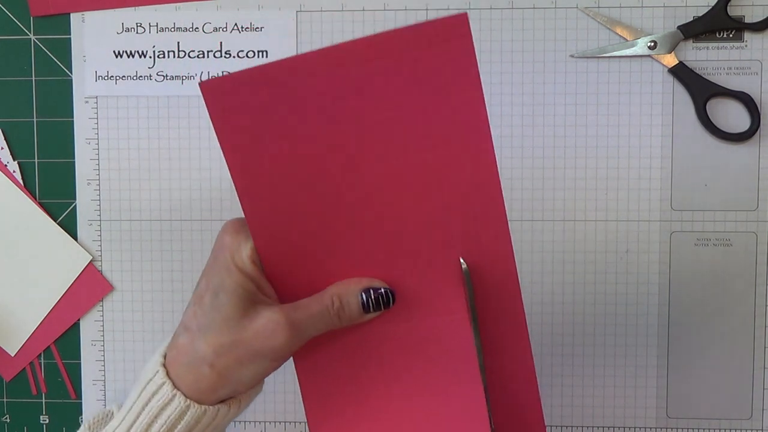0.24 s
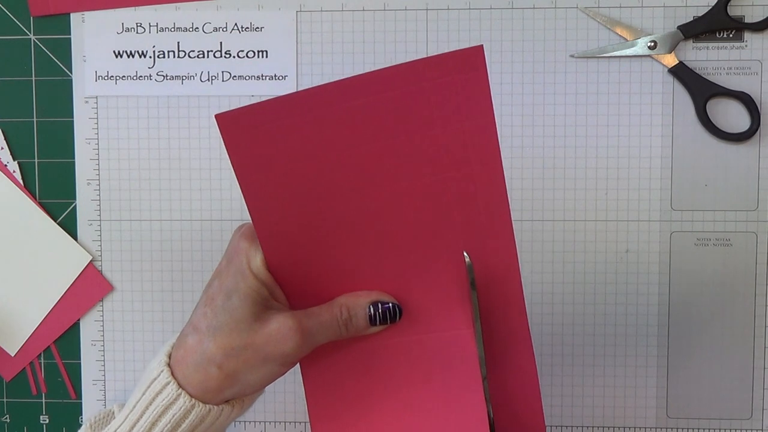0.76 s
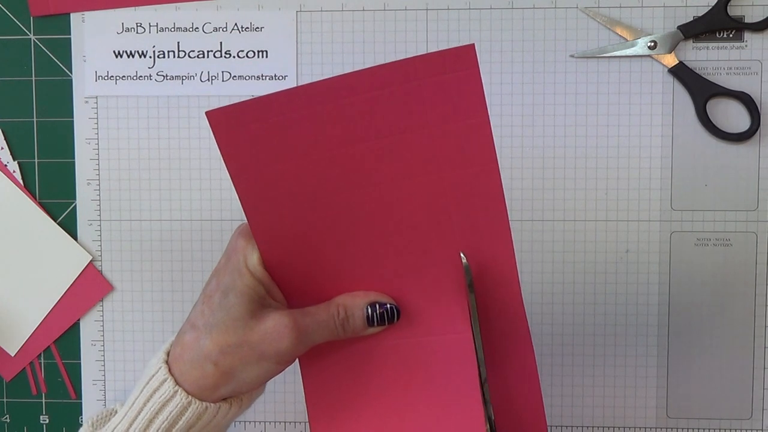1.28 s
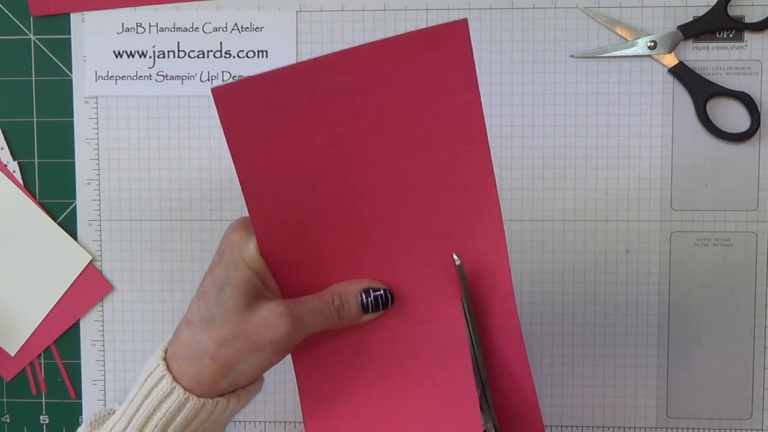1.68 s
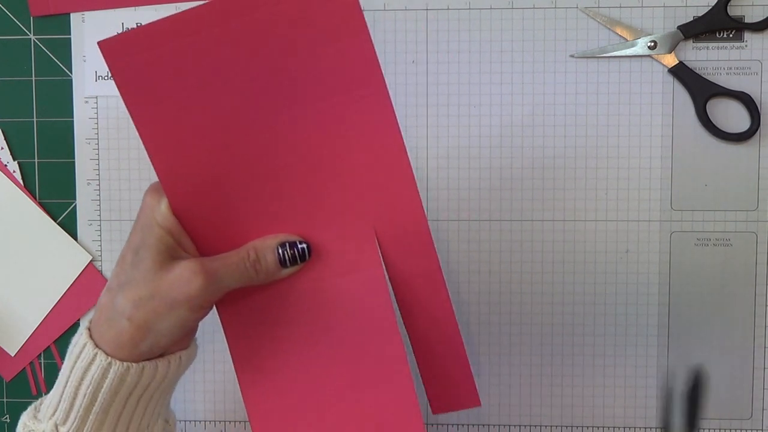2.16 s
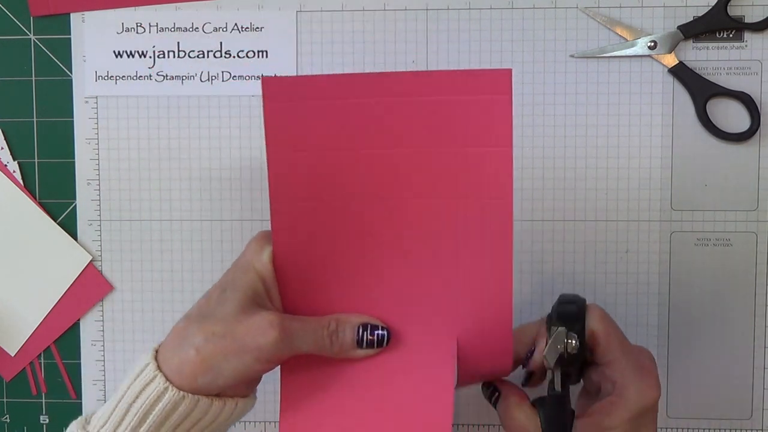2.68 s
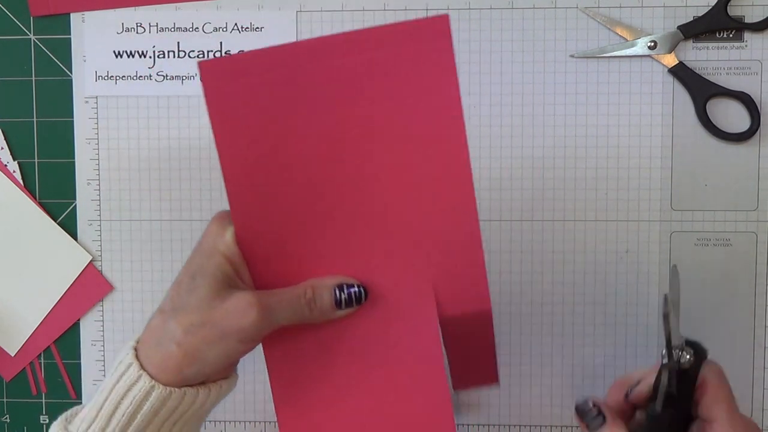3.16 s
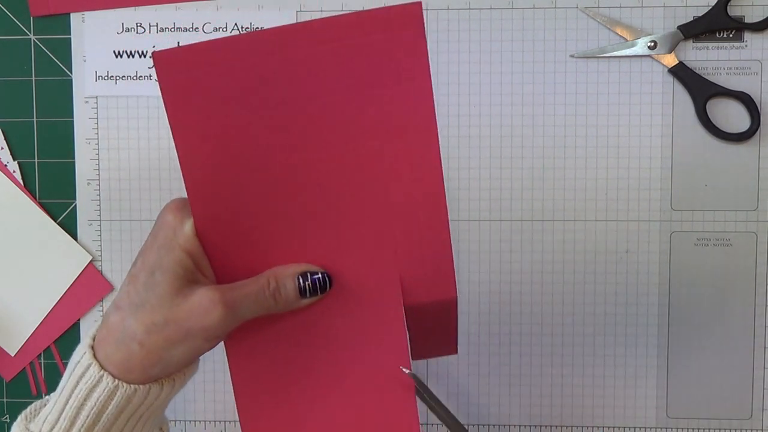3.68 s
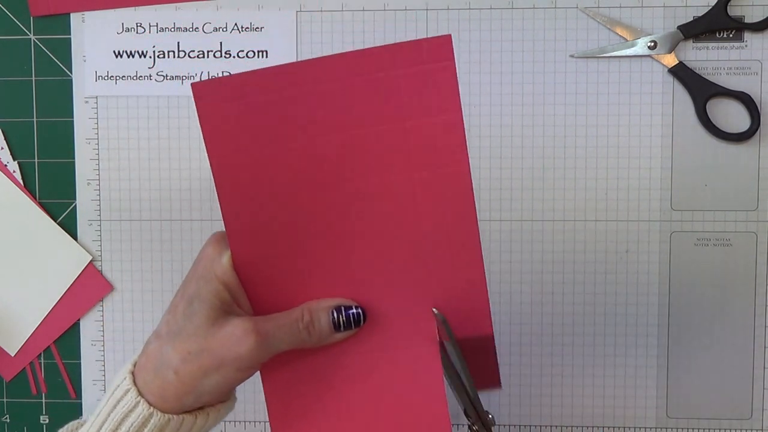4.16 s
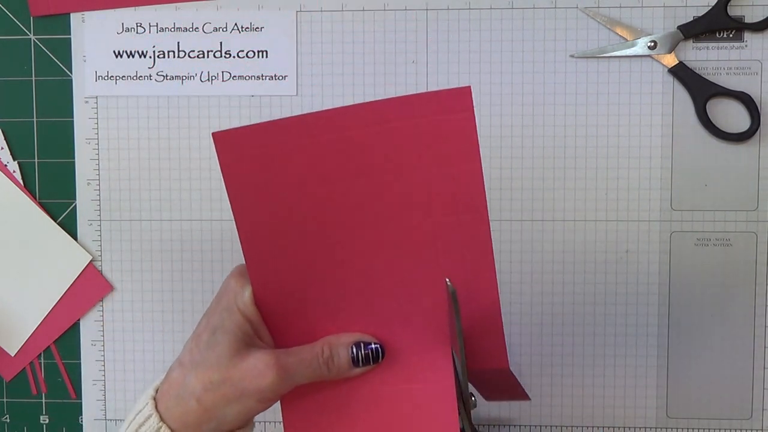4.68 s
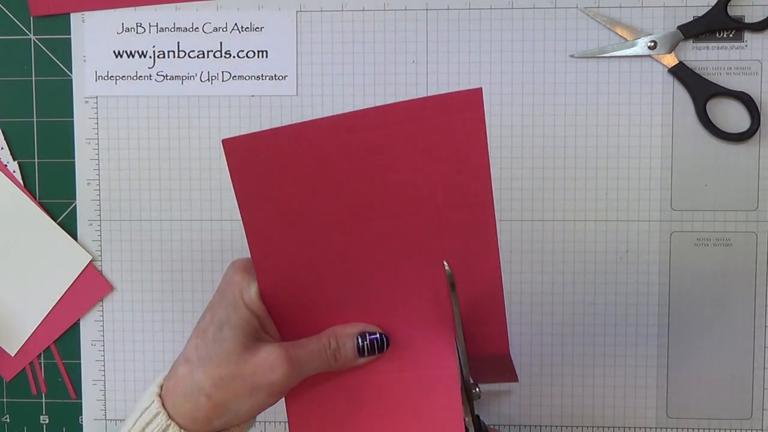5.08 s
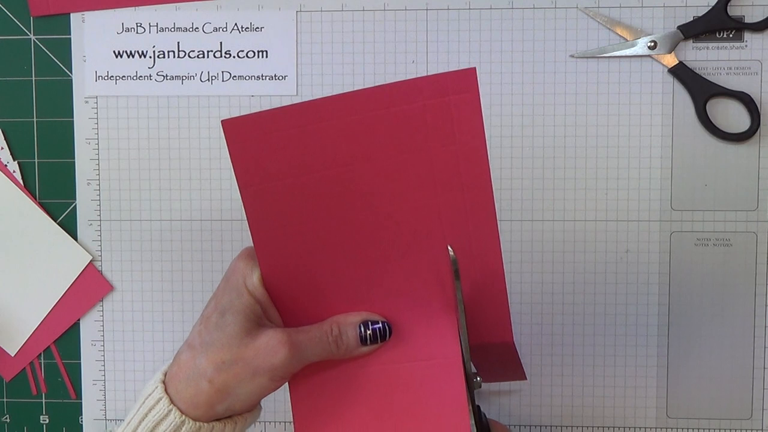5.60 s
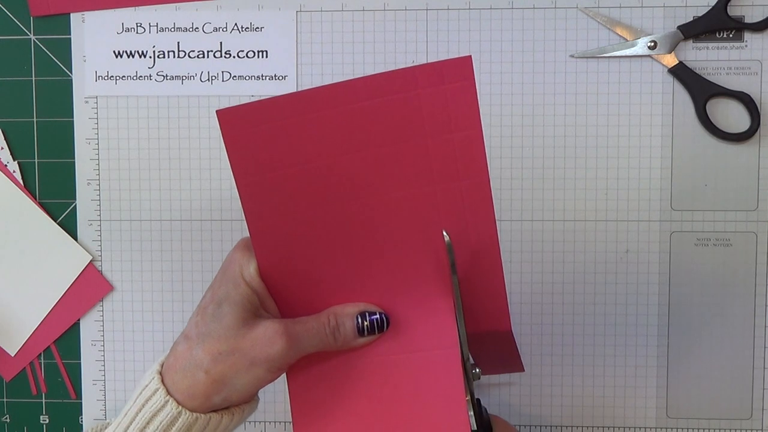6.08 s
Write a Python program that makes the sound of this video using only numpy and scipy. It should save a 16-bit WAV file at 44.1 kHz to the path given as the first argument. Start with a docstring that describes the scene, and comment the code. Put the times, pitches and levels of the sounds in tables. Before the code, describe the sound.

Scissor blades snip and crunch through cardstock in spurts, with light ticks, rubs and a brief squeak in a quiet room.

```python
"""Scissors cut two slits into cardstock above a craft table, over room air and a faint mains hum.
The blades slide shut and bite: fibres snap in dense runs that the stiff sheet radiates, and the card
flops and creaks. Near 2 s the steel squeaks; then the blades slide and tick against each other.
The second cut crunches in near 3.8 s, the card brushes along the blades, and they inch to the slit's end.
The table and a small room answer throughout, nearly in mono."""
import sys
import numpy as np
from scipy import signal
from scipy.fft import rfft, irfft, next_fast_len
from scipy.io import wavfile

SR = 44100
rng = np.random.default_rng(int(sys.argv[2]) if len(sys.argv) > 2 else 0)


def wrap_up_sound(samples):
    """Save the sound to the file named by the first command line argument, as 16-bit audio."""
    columns = np.atleast_2d(samples).T
    # keep every value between -1 and 1, then stretch to whole-number steps
    tamed = np.clip(columns, -1, 1)
    steps = np.round(tamed * 32767).astype(np.int16)
    wavfile.write(sys.argv[1], SR, steps)


N = 279594
FFT_SIZE = next_fast_len(N + SR // 2) * 2
HZ = np.fft.rfftfreq(FFT_SIZE, 1 / SR)
# A push has a force, a boom (lows: the whole sheet moves) and an edge (highs: the blade edge).
# Boom and edge are in dB relative to the force; these are their crossovers.
BOOM_HZ, EDGE_HZ = 1200, 5000


def amp(db):
    """Decibels to gain."""
    return 10 ** (np.asarray(db) / 20)


def unit(x):
    """Scales to rms 1."""
    return x / np.sqrt(np.mean(abs(x) ** 2) + 1e-20)


def curve(points, hz):
    """Follows a breakpoint curve on a log-frequency axis."""
    freqs, values = np.transpose(points)
    return np.interp(np.log(hz + 1), np.log(freqs + 1), values)


def wander(samples, hz):
    """Random drift of rms about 1, turning about hz times a second."""
    at = np.arange(samples) * hz / SR
    knots = int(at[-1]) + 2
    return np.interp(at, np.arange(knots), rng.standard_normal(knots)) * np.sqrt(3 / 2)


def waver(samples, width_hz):
    """Uneven level and phase of a resonance that is driven at random."""
    return unit(wander(samples, 2 * width_hz) + 1j * wander(samples, 2 * width_hz))


def add(mix, start_s, sound):
    """Mixes a sound in at its start time."""
    part = mix[..., max(round(start_s * SR), 0):][..., :sound.shape[-1]]
    part += sound[..., :part.shape[-1]]


def band_gains(force, boom, edge):
    """Gains of the low, middle and high band of a push."""
    return amp([force + boom, force, force + edge]).reshape(3, -1)


def radiate(drive, colour, modes):
    """A three-band drive rings a body that has a broad colour and resonances."""
    peaks_db = sum(lift / (1 + (2 * (HZ - hz) / width) ** 2) for hz, width, lift in modes)
    # Minimum phase: the ring follows the hit.
    cepstrum = irfft(np.log(amp(curve(colour, HZ) + peaks_db)))
    cepstrum[1:FFT_SIZE // 2] *= 2
    cepstrum[FFT_SIZE // 2 + 1:] = 0
    body = np.exp(rfft(cepstrum))
    low = 1 / (1 + (HZ / BOOM_HZ) ** 6)
    high = 1 - 1 / (1 + (HZ / EDGE_HZ) ** 6)
    spectrum = 0
    for push, band in zip(drive, [low, 1 - low - high, high]):
        band_rms = np.sqrt(np.mean(abs(body) ** 2 * abs(band)))
        spectrum += rfft(push, FFT_SIZE) * body * band / band_rms
    return irfft(spectrum)[:N]


def fibres(samples, per_s, spread_db, clump_db, clump_hz, rub):
    """Snaps of uneven size over a smooth rub, bunched by stick and slip."""
    chance, size, sign = rng.random((3, samples))
    strength = amp(spread_db * np.minimum(-np.log(1 - size), 3))
    snaps = (chance < per_s / SR) * strength * np.sign(sign - .5)
    grain = unit(snaps) + rub * rng.standard_normal(samples)
    return unit(grain * amp(clump_db * wander(samples, clump_hz)))


def strokes(rows, fade_s, **texture):
    """Fibre noise that swells to each stroke's crest, sags, and dies quickly once the hand stops."""
    arch_power, sag_db, release_db_per_s, release_s = 1.42, 3.5, 900, .04
    drive = np.zeros((3, N))
    for start, length, crest, force, swell, boom, edge in rows:
        t = np.arange(0, length + release_s, 1 / SR)
        crest_s = length * np.clip(crest, .05, .95)
        before = np.clip(1 - t / crest_s, 0, 1)
        after = np.clip((t - crest_s) / (length - crest_s), 0, 1)
        arch_db = -swell * before ** arch_power - sag_db * after ** arch_power
        attack = np.sqrt(np.minimum(t / fade_s, 1))
        release = amp(-release_db_per_s * np.maximum(t - length, 0))
        # A harder push sounds thinner and brighter.
        push = band_gains(force + arch_db, boom - 0.42 * arch_db, edge + 0.9 * arch_db)
        add(drive, start - fade_s / 2, push * attack * release * fibres(len(t), **texture))
    return drive


def air():
    """Steady room air and hiss, wide in the bass and centred in the treble."""
    # Colour of the air. Each row: frequency in Hz, level in dB.
    colour = [(15, -44), (25, -19), (50, -8.5), (145, -5), (200, -5.5), (249, -9), (309, -3), (344, -10),
              (405, -9.5), (463, -9.5), (2480, -15), (2760, -13.5), (4490, -18.5), (5000, -17),
              (14800, -22), (16000, -27.5)]
    # How alike left and right are. Each row: frequency in Hz, correlation from 0 to 1.
    likeness = [(60, 0.25), (150, 0.32), (380, 0.68), (950, 0.82), (2380, 1), (5980, 0.9), (15000, 0.99)]
    mid, side = rfft(rng.standard_normal((2, FFT_SIZE))) * amp(curve(colour, HZ))
    alike = np.clip(curve(likeness, HZ), 0, 1)
    mid *= np.sqrt((1 + alike) / 2)
    side *= np.sqrt((1 - alike) / 2)
    hiss_rms = np.std(irfft(mid * (HZ > 500)))
    return amp(-60.5) * irfft(np.array([mid + side, mid - side]))[:, :N] / hiss_rms


def hum():
    """Mains harmonics, each wavering a little in level and phase."""
    # The hum's partials. Each row: frequency in Hz, level in dB.
    harmonics = [(49.9, -78), (99.8, -82.5), (149.7, -76), (199.6, -66.5), (249.5, -73.5), (299.4, -72.5),
                 (399.2, -74.5), (449, -85.5)]
    out, t = np.zeros(N), np.arange(N) / SR
    for hz, db in harmonics:
        level = np.sqrt(2) * amp(db + 1.7 * wander(N, 6.1))
        out += level * np.sin(2 * np.pi * (hz * t + rng.random()) + 0.21 * wander(N, 4.9))
    return out


def sliding():
    """Fine friction of steel on steel as the blades open and shut."""
    # Blade slides. Each row: start and length in seconds, then force, swell and edge in dB.
    slides = [(0.0, 0.1, -53.5, -1.5, 3.5), (2.575, 0.12, -53, 5, 6.5), (2.761, 0.088, -60.5, 2, 1.5),
              (2.982, 0.025, -53, 6, 8.5), (3.029, .082, -45.5, 10.5, 0), (3.95, 0.06, -54, 1, 0.5),
              (4.031, .12, -57.5, 1.5, 1)]
    # Colour of the steel. Each row: frequency in Hz, level in dB.
    colour = [(240, -68), (400, -9), (504, -8), (826, -9), (1460, -10), (1990, -9), (4730, -9), (6540, -9),
              (12100, -9), (16000, -21)]
    # Its resonances. Each row: centre and width in Hz, lift in dB.
    modes = [(780, 240, 5.4), (1970, 210, 5.9), (3160, 770, 5.3), (6460, 220, 7.3), (7640, 150, 4),
             (9300, 220, 5.5), (11700, 400, 3.8), (13600, 300, 6)]
    crest, boom_db = 0.87, -10.5
    rows = [(start, length, crest, force, swell, boom_db, edge)
            for start, length, force, swell, edge in slides]
    drive = strokes(rows, fade_s=.0065, per_s=9000, spread_db=5, clump_db=0.7, clump_hz=205, rub=1.0)
    return amp(-2.45) * radiate(drive, colour, modes)


def brushing():
    """The card rubs softly along blades and fingers."""
    # Brushes of the card. Each row: start and length in seconds, force and boom in dB.
    brushes = [(0.147, 0.035, -51, 2), (0.59, 0.082, -59, -1), (1.776, 0.02, -52, 4),
               (3.626, .07, -56.5, 2), (3.822, 0.097, -57, -3), (4.639, .085, -54, -6.5),
               (4.759, 0.049, -57.5, -3), (4.829, .05, -52.5, 2), (4.919, 0.073, -55.5, 1),
               (5.003, .042, -51, -3), (5.137, .03, -61, 2), (5.184, 0.066, -53, -9.5)]
    # Colour of brushed card. Each row: frequency in Hz, level in dB.
    colour = [(180, -40), (300, -8), (856, -6), (1320, -8.5), (1970, -1), (2930, -1.5), (5800, -9),
              (6960, -5), (14700, -21), (16000, -25)]
    crest, swell_db, edge_db = 0.87, 3, -9.5
    rows = [(start, length, crest, force, swell_db, boom, edge_db)
            for start, length, force, boom in brushes]
    drive = strokes(rows, fade_s=.015, per_s=2500, spread_db=-2, clump_db=1.3, clump_hz=118, rub=0.58)
    return amp(-2.5) * radiate(drive, colour, modes=[(3060, 640, 0.83)])


def clicks():
    """Drive of single sharp snaps, after each of which the edge chatters briefly."""
    # Blades snap and tap on the card. Each row: time in seconds, then force, boom and edge in dB.
    taps = [(0.1651, -44, -9, -7), (0.214, -29.5, -16, -7), (1.1114, -52, -1, -14), (1.131, -52, -17, -9),
            (1.233, -46.5, 1, -11), (1.244, -44, -4, -11), (1.2952, -50.5, -20, -9),
            (1.6356, -32.5, -6.5, -11), (1.7733, -47, -1, -3), (1.9933, -32, -1, -2.5),
            (2.225, -38.5, -0.5, -7), (2.5154, -43.5, 0.5, -14), (2.541, -51.5, 3, 0.5),
            (3.6193, -44.5, -5, -11), (3.858, -47.5, -10, -8), (4.1584, -43.5, -13, 4),
            (4.1712, -42, -9, -9), (4.737, -38.5, 0.5, -1), (4.9074, -37, 1, -10.5),
            (5.1192, -42.5, -4.5, -12), (5.7519, -49, -4, -4), (6.0006, -47, -4.5, -4.5),
            (6.039, -53, 4.5, -1), (6.0596, -48.5, -9, -4), (6.1877, -51, -6, 0)]
    # The open blades tick against each other. Each row: time in seconds, force in dB.
    ticks = [(2.5334, -67), (3.1842, -64.5), (3.3418, -59.5), (3.3484, -68), (3.5225, -70.5)]
    click_s, tick_boom_db, tick_edge_db = .005, -6, 16
    drive, t = np.zeros((3, N)), np.arange(round(2 * click_s * SR)) / SR
    for start, *levels in taps + [(at, force, tick_boom_db, tick_edge_db) for at, force in ticks]:
        click = 0.093 * rng.standard_normal(len(t)) * np.exp(-t / 0.0036)
        click[0] = -1  # the snap ahead of the chatter
        click *= np.sqrt(click_s * SR) / np.linalg.norm(click)
        add(drive, start, band_gains(*levels) * click)
    return drive


def cutting():
    """The blades shear the flat sheet, later the sheet with its bent strip."""
    # Squeezes through the card. Each row: start and length in seconds, crest as a share of the
    # length, then force, swell, boom and edge in dB.
    cuts = [(0.191, 0.058, 0.55, -47, 1, 2, -3), (0.252, .052, 0.66, -39.5, 2.5, -9.5, -3.5),
            (0.31, .26, 0.54, -38, 12, -11.5, -9), (1.627, .11, 0.52, -43, 3, -13.5, 2),
            (1.796, 0.065, 0.38, -41.5, 1.5, -8, -5.5), (1.865, .088, 0.75, -46.5, 1.5, -7, 0.5),
            (2.012, 0.09, 1, -39.5, 5.5, -9.5, -1), (3.764, .033, 0.44, -35, 14, -4.5, -3.5),
            (4.155, .108, 0.69, -42, 2.5, -5, -4), (4.29, .19, 0.72, -34, 15.5, -4.5, -2),
            (4.48, 0.11, .85, -39, 5, -3, 0.5)]
    # Colour of the flat and the bent sheet. Each row: frequency in Hz, level in dB.
    flat_colour = [(88, -62), (150, -49), (193, -12), (226, -5), (291, -11), (514, -7.5), (637, -5.5),
                   (1040, -6.5), (2500, -6), (3350, -5), (6140, -8.5), (9820, -11), (13400, -12),
                   (16000, -27)]
    bent_colour = [(88, -39), (150, -19), (354, -8.5), (555, -1), (702, -7.5), (854, -1.5), (1260, -6.5),
                   (2020, 1), (2220, -6), (2600, -0.5), (5250, -11), (7920, -13.5), (11300, -16.5),
                   (16000, -29)]
    # Their resonances. Each row: centre and width in Hz, lift in dB.
    flat_modes = [(656, 91, 7), (866, 150, 9), (1800, 140, 1.5), (2070, 190, 7), (3250, 260, 4.5),
                  (3620, 370, 4.5), (4900, 180, 4.5), (7200, 490, 3.5), (10400, 1400, 5)]
    bent_modes = [(567, 120, 2.8), (845, 40, 10.2), (1140, 110, 5), (1760, 160, 3.6), (2040, 190, 6.1),
                  (2380, 120, 2.1), (3270, 100, 1.4), (3610, 81, 5.1), (6400, 160, 3.1), (6970, 250, 4),
                  (8000, 330, 5.5), (11300, 300, 4)]
    second_slit_s = 3.5
    first = [row for row in cuts if row[0] < second_slit_s]
    second = [row for row in cuts if row[0] >= second_slit_s]
    flat = strokes(first, fade_s=.003, per_s=7000, spread_db=2.5, clump_db=0.9, clump_hz=301.5, rub=0.58)
    bent = strokes(second, fade_s=.003, per_s=3400, spread_db=1, clump_db=1.5, clump_hz=300.5, rub=0.28)
    return (amp(-1.6) * radiate(flat, flat_colour, flat_modes)
            + amp(-3) * radiate(bent, bent_colour, bent_modes))


def crunches():
    """Drive of a bundle of fibres tearing as tension builds over a few milliseconds."""
    # The card gives way. Each row: start and length in seconds, then force, boom and edge in dB.
    tears = [(0.193, 0.007, -40, -9, -10), (0.268, 0.0077, -40.5, 4, -10), (1.035, 0.012, -40.5, -6, -10),
             (1.192, 0.0099, -38, -1.5, -10.5), (1.621, 0.019, -37.5, -8, -13),
             (1.953, 0.016, -40.5, -3, 2.5), (2.036, 0.01, -44.5, -7, 7.5), (2.053, 0.019, -40, -11, 3.5),
             (3.028, 0.008, -55, 7, -2), (3.78, 0.018, -33, -10, -7.5), (4.271, 0.0084, -42, 3.5, -9),
             (4.749, 0.0038, -42.5, -8, -17), (5.628, 0.022, -50.5, -2.5, -2.5),
             (6.113, .009, -48.5, 2, -7), (6.213, .007, -47.5, -1, -9)]
    drive = np.zeros((3, N))
    for start, length, *levels in tears:
        samples = max(round(length * SR), 64)
        burst = fibres(samples, per_s=3500, spread_db=2.5, clump_db=1.2, clump_hz=590, rub=0.48)
        swell = np.linspace(.45, 1, samples) * signal.windows.tukey(samples, .4)
        add(drive, start, band_gains(*levels) * unit(burst * swell))
    return drive


def flops():
    """The sheet springs free; high bending waves cross it first, so each flop falls in pitch."""
    # Flops of the sheet. Each row: start in seconds, level in dB, first and last pitch in Hz,
    # decay in seconds.
    springs = [(0.2166, -32, 720, 333, 0.017), (0.268, -34.5, 653, 455, 0.013),
               (1.774, -49.5, 800, 336, .02), (1.994, -28, 954, 563, 0.014), (4.452, -38, 930, 794, 0.0099),
               (6.036, -47.5, 294, 183, 0.019)]
    glide_s, attack_s = 0.00725, 0.00083
    out, t = np.zeros(N), np.arange(SR // 8) / SR
    for start, db, first, last, decay in springs:
        hz = last + (first - last) * np.exp(-t / glide_s)
        envelope = (1 - np.exp(-t / attack_s)) * np.exp(-t / decay)
        blur = unit(1 + 1.4 * waver(len(t), last / 2))  # stands for echoes from the sheet's edges
        tone = (blur * np.exp(2j * np.pi * np.cumsum(hz) / SR)).real
        add(out, start, amp(db) * envelope * tone)
    return out


def creaks():
    """The card catches on the blade; stick and slip make one resonance sing for a moment."""
    # Catches of the card. Each row: start and length in seconds, pitch in Hz, level in dB.
    catches = [(1.043, 0.022, 1743, -54.5), (1.196, 0.0096, 1682, -38.5), (1.284, 0.049, 1835, -64),
               (1.957, .013, 3500, -35.5), (2.052, 0.016, 3230, -39.5), (3.025, 0.029, 787, -50.5),
               (3.074, .035, 791, -58.5), (3.029, 0.077, 6560, -56.5), (3.774, 0.026, 2398, -38),
               (3.856, .008, 3070, -51), (3.879, 0.006, 2920, -48), (3.898, 0.017, 3030, -55),
               (3.962, 0.054, 2974, -59.5), (4.155, 0.044, 1718, -43.5), (4.906, 0.0037, 4690, -41.5)]
    width_share = .115  # of the resonance's frequency
    out = np.zeros(N)
    for start, length, hz, db in catches:
        t = np.arange(max(round(length * SR), 64)) / SR
        tone = (waver(len(t), width_share * hz) * np.exp(2j * np.pi * hz * t)).real
        add(out, start, amp(db) * unit(tone * signal.windows.tukey(len(t), .6)))
    return out


def squeaks():
    """Steel sticks and slips fast enough to whistle; the rate glides with blade speed and levels off."""
    # Blade squeaks. Each row: start and length in seconds, first and last slip rate in Hz, level in dB.
    slips = [(1.882, 0.053, 2040, 2525, -38), (1.941, .011, 2400, 2260, -41),
             (2.048, 0.027, 2500, 2350, -37)]
    # How strongly the steel radiates the overtones. Each row: frequency in Hz, level in dB.
    colour = [(4500, -26), (7300, -8), (8700, -15), (9900, 2), (11200, -1), (12400, -13)]
    out = np.zeros(N)
    for start, length, first, last, db in slips:
        samples = round(length * SR)
        ease = np.sin(np.linspace(0, np.pi / 2, samples))
        hz = (first + (last - first) * ease) * (1 + 0.014 * wander(samples, 920))
        phase = 2 * np.pi * np.cumsum(hz) / SR
        overtones = sum(amp(curve(colour, k * hz)) * np.sin(k * phase) for k in range(2, 6))
        rasp = unit(amp(2.5 * wander(samples, 700)))
        add(out, start, amp(db) * signal.windows.tukey(samples, .6) * rasp * overtones)
    return out


def inching():
    """Drive of the blades creeping to the end of the slit, fibre by fibre."""
    # Small squeezes. Each row: start and length in seconds, force in dB.
    nudges = [(5.352, 0.031, -57), (5.607, 0.077, -52.5), (5.738, 0.065, -56), (5.908, .056, -53.5),
              (5.998, .07, -57), (6.109, .052, -52.5), (6.192, 0.043, -55)]
    crest, swell_db, boom_db, edge_db = 0.33, 3, -3.5, -4
    rows = [(start, length, crest, force, swell_db, boom_db, edge_db) for start, length, force in nudges]
    return strokes(rows, fade_s=.008, per_s=1100, spread_db=2.2, clump_db=3.5, clump_hz=160.4, rub=0.25)


def card_ring(drive):
    """Snaps ring the card at the blade, with another tone deep in the second slit."""
    # Colour of tapped card and of the slit's far end. Each row: frequency in Hz, level in dB.
    tapped_colour = [(120, -19), (300, -10), (600, 0), (1300, -2), (2000, 5.5), (3500, -2.5), (6000, -2.5),
                     (11000, -3), (16000, -17)]
    end_colour = [(120, -23), (300, -7), (600, 0.5), (1100, -0.5), (2000, 4.5), (4000, -9), (6000, -10),
                  (11000, -11), (16000, -19)]
    # Their resonances. Each row: centre and width in Hz, lift in dB.
    tapped_modes = [(614, 56, 3.1), (994, 54, 7.2), (1736, 84, 4.1), (2160, 180, 2.1), (3130, 100, 1.5),
                    (4100, 240, 5.6)]
    end_modes = [(1130, 120, 9), (1760, 120, 3), (2720, 140, 6), (3930, 590, 13), (4970, 300, 2.5),
                 (10200, 400, 6)]
    slit_end_s = 5.3
    at_end = np.arange(N) > slit_end_s * SR
    return (radiate(drive * ~at_end, tapped_colour, tapped_modes)
            + radiate(drive * at_end, end_colour, end_modes))


def room(sound, wet_db):
    """Direct sound, then a short tail off table and walls with a little stereo width."""
    # Decay of the room. Each row: frequency in Hz, seconds to fall by 60 dB.
    decay = [(200, 0.4), (800, 0.23), (2500, 0.15), (7000, 0.11), (15000, 0.095)]
    # Width of the tail. Each row: frequency in Hz, side level in dB.
    width = [(200, -11), (600, -11.5), (1100, -18), (2300, -36), (3600, -46), (5300, -12), (8000, -6),
             (13000, -39)]
    echoes_per_s, predelay_s = 6000, .002
    t = np.arange(SR // 3) / SR
    echoes = rng.standard_normal((2, len(t)))
    echoes *= (rng.random((2, len(t))) < echoes_per_s / SR) * (t > predelay_s)
    hz, age, spectra = signal.stft(echoes, SR, nperseg=256)
    fade = amp(-60 * age / curve(decay, hz)[:, None])
    tails = signal.istft(spectra * fade, SR, nperseg=256)[1]
    mid, side = amp(wet_db) * tails / np.linalg.norm(tails[0])
    mid[0] += 1  # the direct sound
    side_gain = amp(curve(width, np.fft.rfftfreq(len(side), 1 / SR)))
    side = irfft(rfft(side) * side_gain, len(side))
    return signal.fftconvolve(sound[None], np.array([mid + side, mid - side]), axes=1)[:, :N]


def scene():
    """Scissors and card slightly right of centre, in the humming room."""
    friction = cutting() + sliding() + brushing()
    snaps = card_ring(amp(-3) * inching() + amp(-1.5) * crunches() + amp(-3) * clicks())
    scissors = room(friction + snaps + flops() + creaks() + squeaks(), wet_db=-9)
    return scissors * amp([[-.15], [.15]]) + air() + hum() * amp([[-.8], [.8]])


def record(dry):
    """A steep low-pass takes off the top above 16 kHz."""
    lowpass = signal.firwin(511, 16000, window=("kaiser", 9), fs=SR)
    return signal.oaconvolve(dry, lowpass[None], "same")


dry = scene()
out = record(dry)
wrap_up_sound(out)
```